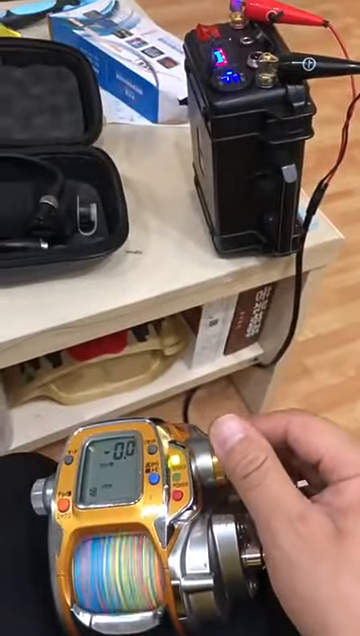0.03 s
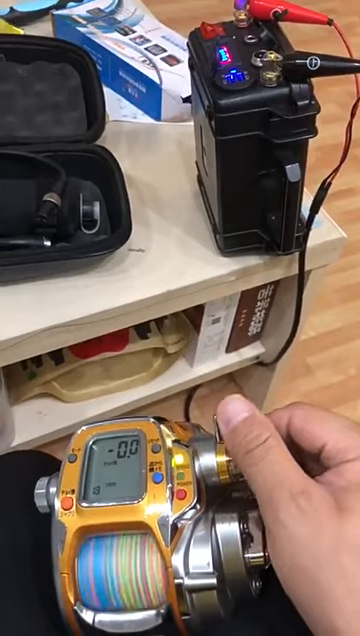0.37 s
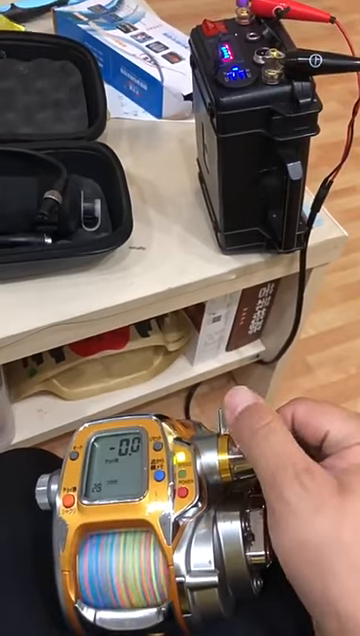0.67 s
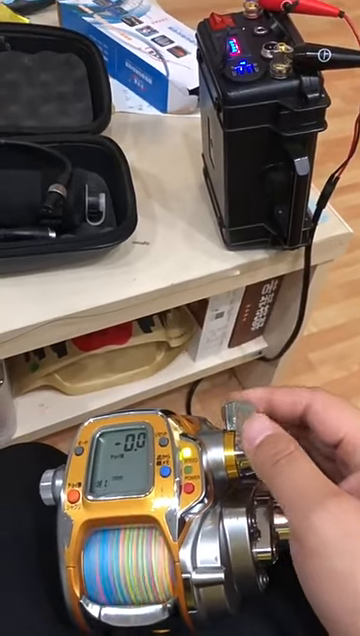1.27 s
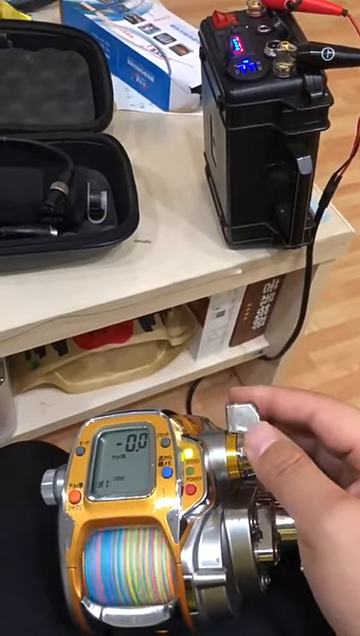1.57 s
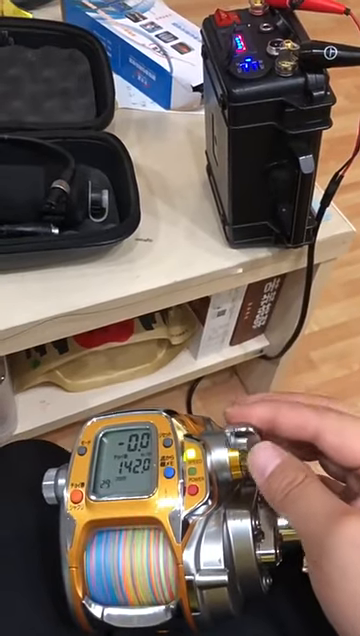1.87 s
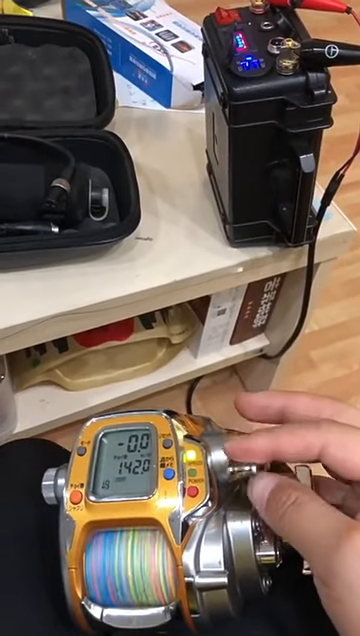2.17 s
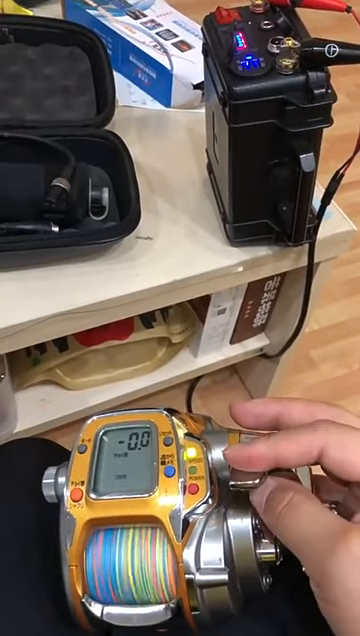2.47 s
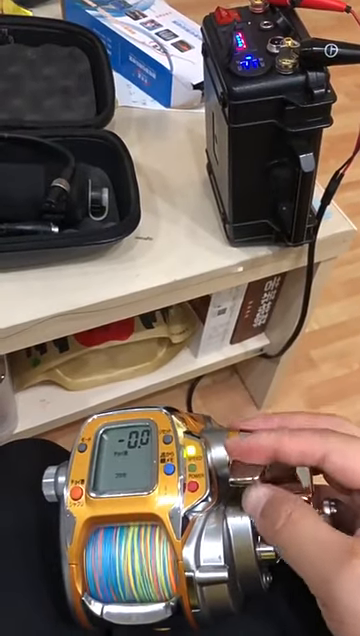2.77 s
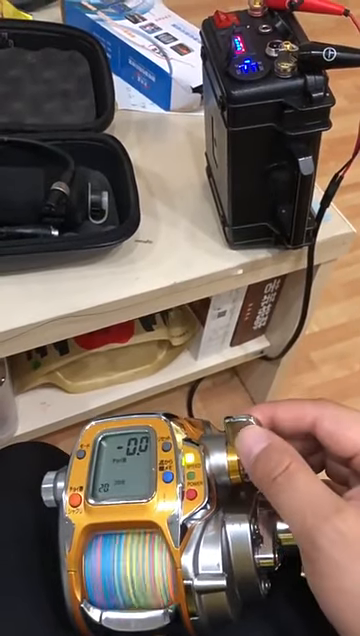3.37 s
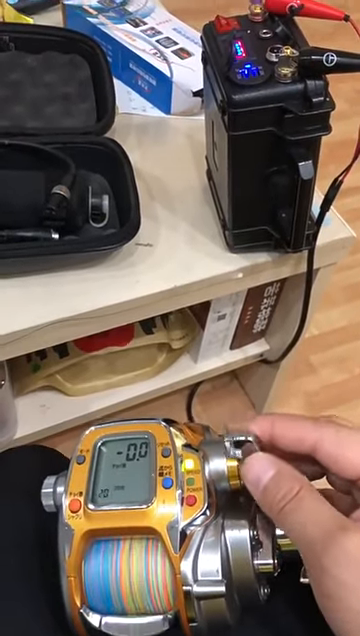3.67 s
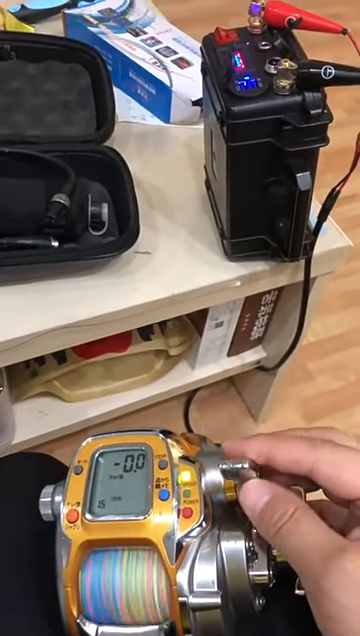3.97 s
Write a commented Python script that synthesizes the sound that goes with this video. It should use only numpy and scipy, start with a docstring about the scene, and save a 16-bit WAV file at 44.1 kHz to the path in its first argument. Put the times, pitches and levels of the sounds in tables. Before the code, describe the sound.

Close up in a quiet room, the geared motor of an electric fishing reel whirs faster, runs steadily, then slows to a brief halt. It jerks into motion again and quickly climbs back to a hissy whine, with a few light ticks.

```python
"""The gear train of an electric fishing reel winds with no load, close by in a small quiet room.
A lever sets the motor speed: it climbs, holds, runs down to a stop, then jerks into motion again.
An 11-tooth pinion drives a 21-tooth wheel: periodic tooth contact radiates a whine, and tooth impacts
excite the modes of the casing. Sliding friction makes the brushes hiss, and at part throttle the
chopped drive current modulates rattle and hiss into a buzz."""
import sys
import numpy as np
from scipy import signal
from scipy.fft import rfft, irfft
from scipy.io import wavfile
from scipy.ndimage import uniform_filter1d

SR = 44100
rng = np.random.default_rng(int(sys.argv[2]) if len(sys.argv) > 2 else 0)


def pcm_store(signal):
    """Save signal as 16-bit PCM."""
    levels = np.round(np.clip(np.atleast_2d(signal), -1, 1) * 32767)
    wavfile.write(sys.argv[1], SR, levels.astype(np.int16).T)


N = 176400
T = np.arange(N) / SR

PINION_TEETH, WHEEL_TEETH = 11, 21
GEAR_RATIO = PINION_TEETH / WHEEL_TEETH
CRUISE_HZ, CHOP_HZ, HARD_ACCEL_HZ_PER_S = 218, 250, 420

# Rotation frequency of the motor: t/s, f/Hz
MOTOR_SPEED = [(0.0, 119.5), (0.1, 137.2), (0.2, 157.1), (0.33, 172.7), (0.47, 204.4), (0.62, 207.6),
               (0.85, 212.7), (1.1, 218.5), (1.25, 218.5), (1.45, 219.5), (1.69, 218.2), (1.85, 206.8),
               (2.0, 201.6), (2.25, 186.2), (2.4, 155.6), (2.55, 99.1), (2.7, 50.9), (2.92, 0.0),
               (3.058, 0.0), (3.2, 90.9), (3.3, 153.4), (3.4, 197.1), (3.49, 204.1), (3.78, 203.1),
               (3.9, 195.3), (4.0, 192.9)]
# Gain of the running noise: t/s, level/dB
RUNNING_LEVEL = [(0, -2), (.12, -0.5), (.3, .5), (.55, -0.5), (1.2, -1), (1.9, -.5), (2.33, -1),
                 (2.48, -4.5), (2.6, -9.6), (2.76, -15), (2.88, -25.5), (2.96, -36.5), (3.055, -50),
                 (3.06, -9.5), (3.12, -6), (3.22, -1), (3.33, 1), (3.55, -.5), (3.72, -0.5), (4, 0)]
# Modulation by the chopped current: t/s, depth/1
BUZZ_DEPTH = [(0, 0.22), (.35, 0.27), (.8, 0.1), (1.6, 0), (2.15, 0.24), (2.45, 0), (2.95, 0.26),
              (3.08, 0.2), (3.5, 0.1), (4, 0)]
# Harmonics of the pinion and of the wheel rotation: order/1, relative level/dB
PINION_ORDERS = [(1, -25.5), (3, -23), (4, -18), (6, -21), (8, -19), (9, -17), (10, -6.5), (11, 0),
                 (12, -4.5), (13, -16), (17, -14.5), (18, -13), (19, -12.5), (21, -8.5), (22, -12),
                 (27, -16.5), (33, -16), (45, -25)]
WHEEL_ORDERS = [(2, -33), (19, -7), (20, -11), (22, -8.5), (23, -8.5), (24, -13), (25, -9.5), (29, -11.5),
                (30, -10), (31, -10), (33, -13), (62, -10.5)]
# Radiation response for the whine: f/Hz, level/dB
RADIATION = [(100, -22), (200, 1), (500, -11), (800, -4), (1200, -2), (1600, -4), (1850, 3.3), (2080, -4),
             (2250, 1.3), (2420, -0.5), (2530, 2.5), (2900, 1), (3100, 0), (3280, 5), (3400, -2), (3720, 5),
             (4100, 1), (9000, -5.5)]
# Casing response to tooth impacts: f/Hz, level/dB
CASING_RESPONSE = [(100, -35.5), (300, -28), (400, -23), (560, -25.5), (670, -16.5), (790, -7.5),
                   (900, -8.5), (1020, -7.5), (1300, -9), (1600, -7), (2000, -3), (2400, -2.5),
                   (2750, -0.75), (3300, -1), (3750, 1.5), (4300, -0.5), (5200, -8.5), (6500, -10.5),
                   (7600, -19), (14000, -24.5)]
# Modes of the casing and of the gear train: f/Hz, relative level/dB, T60/s
CASING_MODES = [(787.6, -67.5, 0.03), (1025, -57.5, 0.061), (1940, -62, 0.016), (2830, -53.5, 0.036),
                (3280, -50.5, 0.077), (3694, -47.5, 0.03)]
GEAR_MODES = [(785, -29, .045), (1004, -27.5, .06), (2010, -29.5, 0.047), (2260, -28.5, 0.044),
              (2960, -30, .025), (3580, -26, .025), (3760, -29, .04), (4100, -25, .02), (5520, -27, .012),
              (5900, -28, .012)]
# Gear train response: f/Hz, level/dB
GEAR_RESPONSE = [(200, -22), (550, -17), (760, -0.5), (1100, 0), (1500, -2), (2000, 0.5), (4100, 0),
                 (4900, -2), (5600, -0.5), (7000, -2.5), (8000, -8), (14000, -9)]
# Impulses as the slack closes: t/s, relative level/dB
CLUNKS = [(3.0583, -25), (3.0617, -14), (3.066, -17)]
# Spectrum of the brush friction: f/Hz, level/dB
BRUSH_SPECTRUM = [(1000, -25), (4000, -3.5), (5800, 5), (6900, -0.5), (7550, -5), (8500, 0), (10100, 0.5),
                  (10900, -4), (11800, 3.5), (12500, 2.5), (13400, -1.5), (14100, 3.5)]
# Modes of thin metal parts rung by the brushes: f/Hz, relative level/dB, T60/s
METAL_MODES = [(4582, -45, .05), (5780, -47, .03), (6749, -46, .05), (10168, -50, .07), (11730, -50, .06),
               (12227, -50, .06), (12902, -48, .06), (14062, -52, .08)]
# Backlash impacts: t/s, relative level/dB, time constant/s
TICKS = [(0.473, -30, 0.00068), (1.3828, -33, .001), (2.1023, -24.5, .0006), (2.145, -21, 0.00057),
         (2.934, -59, .002), (2.939, -50.5, .0035), (3.402, -25.5, .0006), (3.707, -21.5, 0.0007),
         (3.851, -27, .0006), (3.9064, -28, .0006)]
# Spectrum of those impacts: f/Hz, level/dB
TICK_SPECTRUM = [(200, -29), (550, -18), (850, -4.5), (2000, 3.5), (3800, 8), (6000, 1), (8000, -12),
                 (14000, -7.5)]
# Hand knocks on the lever: t/s, f/Hz, level/dB, half-width/s
BUMPS = [(2.137, 85, -57, 0.074), (2.675, 540, -54, 0.023)]
# Spectrum of the room air: f/Hz, level/dB
AIR_SPECTRUM = [(20, -5), (60, -1.5), (130, -2.5), (200, 5), (280, 0.5), (450, -7.5), (900, -15),
                (1500, -20), (4000, -29), (7000, -37), (14000, -44)]
# Appliance hum: f/Hz, level/dB
HUM = [(57, -63.5), (101, -78), (199, -77)]


def mesh_whine(speed, turns, level_db=-37, flutter=0.23, knee_hz=122, sideband_slope_db=16.5):
    """Periodic tooth contact radiates a mesh tone and sidebands, which blur and fade at low speed."""
    slack = 6 * (1 - speed / CRUISE_HZ) ** 2
    jitter = (0.24 * drift(25) + slack * drift(110)) / (2 * np.pi * PINION_TEETH)
    tones = np.zeros(N)
    for orders, ratio in ((PINION_ORDERS, 1), (WHEEL_ORDERS, GEAR_RATIO)):
        for multiple, db in orders:
            order = multiple * ratio
            tone = cycle(order * (turns + jitter) + rng.random() + 0.049 * drift(7.1))
            is_mesh = np.isclose(order, PINION_TEETH)
            sideband_db = 0 if is_mesh else sideband_slope_db * (speed / CRUISE_HZ - 1)
            gain = amp(db + sideband_db) * gain_at(RADIATION, order * speed)
            tones += gain * (1 + flutter * drift(18)) * tone
    return np.sqrt(2) * amp(level_db) * tones / (1 + (knee_hz / (speed + 1)) ** 3.5)


def tooth_impacts(speed, turns, wear_db=1.63, spread_db=2.5, sliding=0.77):
    """Impact excitation: teeth land unevenly, straying and rebounding more with speed or hard pull."""
    unrest = np.maximum((speed / CRUISE_HZ) ** 2, inertial_load(speed))
    position = PINION_TEETH * turns + 0.2 * unrest * drift(1500)
    tooth = np.floor(np.maximum.accumulate(position)).astype(int)
    hits = np.flatnonzero(np.diff(tooth))
    wear = sum(rng.standard_normal(n)[tooth[hits] % n] for n in (PINION_TEETH, WHEEL_TEETH))
    chance = np.clip(rng.standard_normal(N), -2, 2)
    flank = np.sign(rng.random(N) - 0.13 - 0.36 * unrest)  # negative: a bounce on the back flank
    knocks = np.zeros(N)
    knocks[hits] = flank[hits] * amp(wear_db * wear + spread_db * chance[hits])
    power = uniform_filter1d(knocks ** 2, size=1500)
    levelled = knocks / np.sqrt(abs(power) + 0.046 * power.mean())
    return unit(levelled + sliding * rng.standard_normal(N))


def mesh_pressure(speed, turns):
    """Eccentricity: each gear presses harder once a turn, and the two rates beat slowly."""
    wheel = turns * GEAR_RATIO
    swing = 0.19 * cycle(turns) + 0.1 * cycle(wheel) + 0.085 * cycle(2 * wheel - turns)
    return unit(np.exp(swing * np.sqrt(speed / CRUISE_HZ)))


def casing_rattle(speed, turns, gain, level_db=-30.5):
    """Forced vibration: tooth impacts pass through the frame and excite the casing modes."""
    force = amp(level_db) * gain * mesh_pressure(speed, turns) * disperse(tooth_impacts(speed, turns))
    return colour(resonate(force, CASING_MODES), CASING_RESPONSE)


def casing_resonance(speed, turns, mode_hz=3700, peak_speed_hz=172, width_hz=17, level_db=-26):
    """Resonance: the casing sings once a wheel turn as twice the mesh rate climbs past its main mode."""
    wheel = turns * GEAR_RATIO
    nearness = 1 / (1 + ((speed - peak_speed_hz) / width_hz) ** 2)
    climbing = uniform_filter1d(1. * (np.gradient(speed) > 0), size=2000)
    build_up = amp(-4.5 * inertial_load(speed))  # a quick climb gives the ring less time to grow
    bursts = unit(np.exp(1.5 * cycle(wheel) + 0.3 * drift(60)))
    throb = amp(-39) * (1 + cycle(2 * wheel - turns)) * (speed / CRUISE_HZ) ** 2
    envelope = amp(level_db) * nearness * climbing * build_up * bursts + throb
    return envelope * cycle(mode_hz * T + 0.26 * drift(90))


def coasting(speed, turns, level_db=-36.5, step_db=-2.5):
    """Harmonic series: unloaded teeth tick evenly, so overtones glide down as the motor slows."""
    slowing = np.clip(-acceleration(speed) / HARD_ACCEL_HZ_PER_S, 0, 1)
    tones = np.zeros(N)
    for k in range(2, 9):
        gain = gain_at(CASING_RESPONSE, k * PINION_TEETH * speed) * amp(step_db * (k - 2))
        tones += gain * (1 + 0.92 * drift(30)) * cycle(k * PINION_TEETH * turns + 0.2 * drift(50))
    return amp(level_db) * slowing * tones


def brush_hiss(speed, turns, gain, level_db=-30.5, slope_db=10):
    """Sliding friction: gritty noise pulses with rotation, grows with speed and rings thin metal."""
    swing = np.exp(0.11 * (cycle(turns) + cycle(turns * GEAR_RATIO)))
    friction = amp(level_db + slope_db * (speed / CRUISE_HZ - 1)) * swing * grit(spread_db=4.5)
    return colour(resonate(gain * friction, METAL_MODES), BRUSH_SPECTRUM)


def restart(start_s=3.058, fade_s=0.28):
    """Transient response: the gears clunk across their slack, then drive pulses keep them ringing."""
    blows = sum(amp(db) * (np.arange(N) == round(s * SR)) for s, db in CLUNKS)
    pulses = np.diff(np.floor(CHOP_HZ * T), prepend=0) * (1 + 0.35 * rng.standard_normal(N))
    chatter = grit(spread_db=3.3)
    strain = (T > start_s) * np.exp(-abs(T - start_s) / fade_s)
    drive = strain * (amp(-30.5) * pulses + amp(-51) * chatter)
    return colour(resonate(disperse(blows + drive), GEAR_MODES), GEAR_RESPONSE)


def backlash_ticks():
    """Backlash: teeth cross their play and snap in exponentially decaying bursts of noise."""
    envelope = sum(amp(db) * (T >= s) * np.exp(-abs(T - s) / decay) for s, db, decay in TICKS)
    return 2 * colour(envelope * rng.standard_normal(N), TICK_SPECTRUM)


def lever_bumps():
    """Soft impact: the hand on the lever gives smooth pulses of low, narrow-band noise."""
    return sum(amp(db) * np.exp(-((T - s) / half_width) ** 2) * drift(40) * cycle(hz * T)
               for s, hz, db, half_width in BUMPS)


def room(x, level_db=-9, t60_s=0.13):
    """Reverberation: sparse reflections from furniture and walls add a short tail."""
    t = T[:12000]
    reflections = rng.standard_normal(len(t)) * (rng.random(len(t)) < 0.1) * (t > 0.002)
    tail = reflections * amp(-60 * t / t60_s)
    return x + amp(level_db) * signal.oaconvolve(x, tail / np.linalg.norm(tail))[:N]


def background(air_db=-63.5):
    """Ambient noise: tonal appliance hum superposed on faint broadband room air."""
    hum = sum(np.sqrt(2) * amp(db) * cycle(hz * T + rng.random()) for hz, db in HUM)
    return hum + amp(air_db) * colour(rng.standard_normal(N), AIR_SPECTRUM)


def acceleration(speed):
    """Smoothed time derivative of the speed, in Hz/s."""
    return uniform_filter1d(np.gradient(speed) * SR, size=3000)


def inertial_load(speed):
    """Inertia: tooth load rises with acceleration, on a scale of 0 to 1."""
    return np.clip(acceleration(speed) / HARD_ACCEL_HZ_PER_S, 0, 1)


def resonate(x, modes):
    """Modal superposition: each mode adds a damped sinusoidal response to the excitation."""
    t = T[:4096]
    ring = sum(amp(db - 60 * t / t60) * cycle(hz * t) for hz, db, t60 in modes)
    return x + signal.oaconvolve(x, ring)[:N]


def disperse(x, max_delay_s=0.003):
    """Dispersion: the frame gives each frequency its own group delay, spreading every knock."""
    hz = np.fft.rfftfreq(N, 1 / SR)
    knots_hz = np.arange(0, SR, 260)
    delay = np.interp(hz, knots_hz, max_delay_s * rng.random(len(knots_hz)))
    return irfft(rfft(x) * np.exp(-2j * np.pi * np.cumsum(delay) * hz[1]), N)


def colour(x, spectrum):
    """Minimum-phase filtering, with unit energy and the given spectral shape."""
    log_gain = np.log(gain_at(spectrum, abs(np.fft.fftfreq(4096, 1 / SR))))
    taps = np.fft.ifft(np.exp(np.conj(signal.hilbert(log_gain)))).real[:2048]
    return signal.oaconvolve(x, taps / np.linalg.norm(taps))[:N]


def gain_at(spectrum, hz):
    """Amplitude response, interpolated in dB over log frequency."""
    f, db = np.transpose(spectrum)
    return amp(np.interp(np.log(hz + 1), np.log(f), db))


def drift(rate_hz):
    """Random fluctuation: low-pass noise of rms 1."""
    rolloff = 1 + (np.fft.rfftfreq(N, 1 / SR) / rate_hz) ** 2
    return unit(irfft(rfft(rng.standard_normal(N)) / rolloff, N))


def grit(spread_db):
    """Log-normal modulation: noise of uneven grains, rms 1."""
    return unit(rng.standard_normal(N) * amp(spread_db * np.clip(rng.standard_normal(N), -3, 3)))


def curve(points):
    """Linear interpolation over time."""
    return np.interp(T, *np.transpose(points))


def cycle(turns):
    """Harmonic oscillation, phase in turns."""
    return np.cos(2 * np.pi * turns)


def amp(db):
    """Amplitude ratio of a level."""
    return 10 ** (np.asarray(db) / 20)


def unit(x):
    """Normalisation to rms 1."""
    return x / np.sqrt(np.mean(x ** 2) + 1e-20)


def scene():
    """Superposition: the reel's noises in the room, its direct whine and the background."""
    speed = curve(MOTOR_SPEED)
    turns = np.cumsum(speed) / SR
    running = amp(curve(RUNNING_LEVEL))
    buzz = 1 + curve(BUZZ_DEPTH) * cycle(CHOP_HZ * T)
    reel = casing_rattle(speed, turns, running * buzz)
    reel += running * (coasting(speed, turns) + casing_resonance(speed, turns))
    reel += brush_hiss(speed, turns, running * buzz)
    reel += restart() + backlash_ticks() + lever_bumps()
    whine = running * amp(-3 * inertial_load(speed)) * mesh_whine(speed, turns)
    return np.tile(room(reel) + whine + background(), (2, 1))


def record(dry):
    """Band limiting: one microphone on both channels, through a steep low-pass filter."""
    cutoff_hz = 14280
    taps = signal.firwin(1023, cutoff_hz, window=("kaiser", 9), fs=SR)
    return signal.oaconvolve(dry, taps[None], "same", axes=1)


dry = scene()
out = record(dry)
pcm_store(out)
```